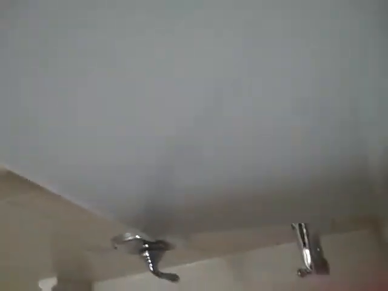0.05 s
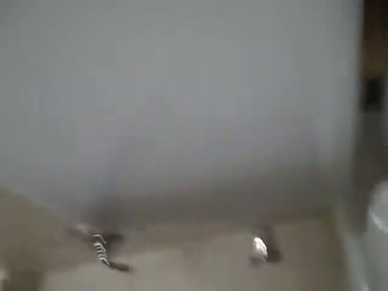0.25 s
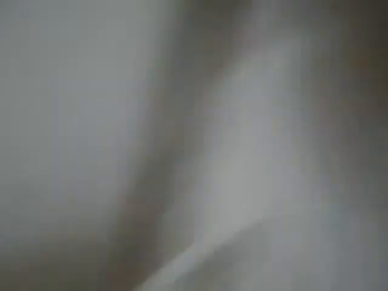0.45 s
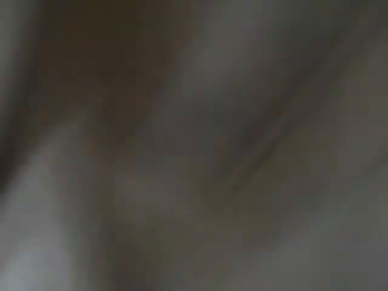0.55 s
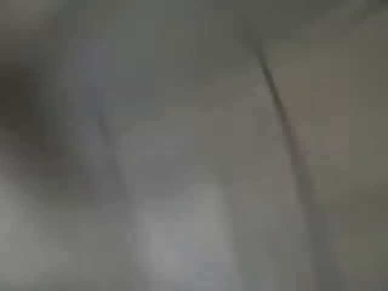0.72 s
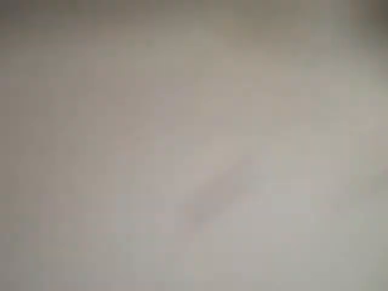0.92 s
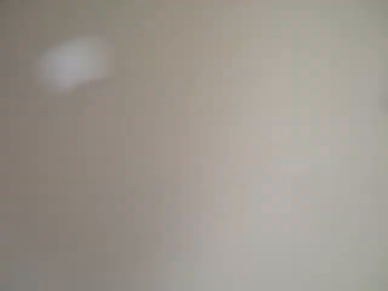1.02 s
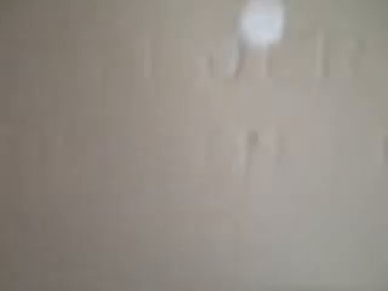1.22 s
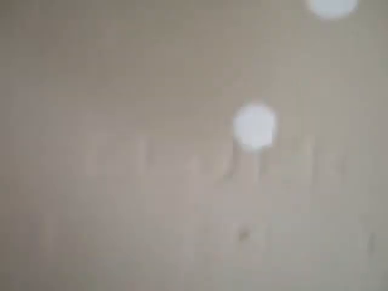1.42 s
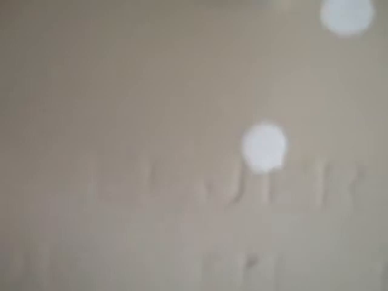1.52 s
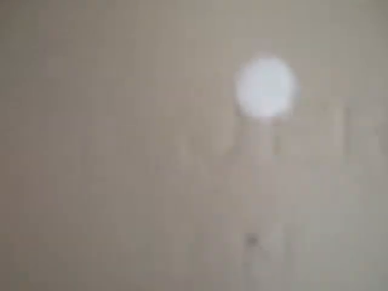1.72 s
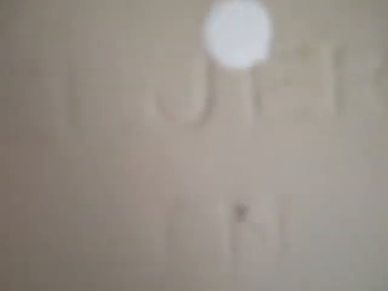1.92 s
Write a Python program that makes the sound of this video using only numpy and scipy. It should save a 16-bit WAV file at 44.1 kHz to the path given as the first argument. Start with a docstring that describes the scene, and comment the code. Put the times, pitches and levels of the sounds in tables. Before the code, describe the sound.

After a moment of quiet room noise with soft bumps, a ceramic lid lands hard, rocks and knocks again with a short hollow ring; then faint sleeve rubbing and handling ticks continue close to the microphone.

```python
"""Soft bumps in quiet room noise, then a heavy ceramic lid set down in a small tiled room.
The lid lands, rocks and knocks a second time: clunks, glaze clinks and low pushes, over ringing modes.
Then cloth and a hand brush faintly near the microphone, with a few ticks and more soft bumps.
Brushing and sliding are shaped noise; ticks are damped resonances with snaps; bumps are fading noise bands."""
import sys
import numpy as np
from scipy import signal
from scipy.fft import rfft, irfft
from scipy.io import wavfile
from scipy.ndimage import map_coordinates

SR = 44100
rng = np.random.default_rng(int(sys.argv[2]) if len(sys.argv) > 2 else 0)


def to_wav(sig):
    """Store sig (one row per channel, or 1-D mono) as 16-bit WAV at the path in sys.argv[1].

    Samples outside -1..1 are clipped; the rate is SR.
    """
    pcm = np.clip(np.atleast_2d(sig), -1, 1) * 32767
    pcm = np.round(pcm).astype(np.int16)
    wavfile.write(sys.argv[1], SR, pcm.T)  # frames by channels


N = 85995  # length in samples
T = np.arange(N) / SR  # time in seconds
HZ = np.fft.rfftfreq(N, 1 / SR)  # frequency axis of the whole scene


def amp(db):
    """Decibels to gain."""
    return 10 ** (np.asarray(db) / 20)


def unit(x):
    """Scales to energy 1."""
    return x / np.sqrt(np.sum(x ** 2) + 1e-20)


def read(points, hz):
    """Reads a table along a log-frequency axis."""
    f, value = np.transpose(points)
    return np.interp(np.log(hz + 1), np.log(f), value)


def add(mix, s, sound):
    """Mixes a sound in at time s, in seconds."""
    part = mix[max(round(s * SR), 0):][:len(sound)]
    part += sound[:len(part)]


def dying(t, t60):
    """Exponential decay that loses 60 dB in t60 seconds."""
    return np.exp(-np.log(1000) * t / t60)


def noise(db):
    """Noise of rms 1 with the given spectrum in dB."""
    coloured = irfft(rfft(rng.standard_normal(N)) * amp(db), N)
    return unit(coloured) * np.sqrt(N)


def crack(spectrum, t60, size=4096):
    """A burst of many fast-dying modes with a causal colour, energy 1."""
    burst = rng.choice([-1., 1.], size) * dying(T[:size], t60)
    hz = abs(np.fft.fftfreq(size, 1 / SR))
    log_gain = np.log(amp(read(spectrum, hz)))
    # minimum phase: the colour starts at once and never rings ahead of the blow
    colour = np.fft.ifft(np.exp(np.conj(signal.hilbert(log_gain)))).real
    return unit(signal.fftconvolve(burst, colour[:size // 2]))


def ping(hz, width_hz, size=4096):
    """One heavily damped resonance with a soft start, energy 1."""
    t = T[:size]
    envelope = t * np.exp(-np.pi * width_hz * t)
    return unit(envelope * np.sin(2 * np.pi * hz * t))


def room(x):
    """Dense reflections from tiled walls build up, then fade; the treble dies first."""
    # Decay of the small tiled room. Each row: frequency in Hz, t60 in seconds
    room_t60 = [(100, .42), (400, 0.33), (1000, .29), (2800, 0.22), (7000, 0.19), (15000, 0.15)]
    build_s = 0.0073
    hz, t, z = signal.stft(rng.choice([-1., 1.], SR), SR, nperseg=256)
    faded = z * dying(t, read(room_t60, hz)[:, None])
    tail = signal.istft(faded, SR, nperseg=256)[1][:SR]
    build = 1 - np.exp(-(T[:SR] / build_s) ** 2)
    return signal.fftconvolve(x, unit(tail * build))[:N]


def ceramic_ring():
    """The modes of lid and bowl, one second of decaying sines with alternating polarity."""
    # Ringing of lid and bowl. Each row: frequency in Hz, relative level in dB, t60 in seconds
    modes = [(168, -29, 0.8), (185.5, -10, 0.42), (307.2, -12.5, 0.55), (337.6, -7, 0.29),
             (386.6, -3.5, 0.41), (392.5, -0.5, 0.13), (433, -2, 0.192), (549, -8.5, .25),
             (577.5, -2, 0.41), (728, -10, 0.28), (793, -2.5, 0.11), (1019, -17.5, 0.46), (1093, 3.5, 0.2),
             (1136, -7, 0.22), (1432, -8.5, .22), (1754, -10.5, .32), (1985, -7.5, 0.27),
             (2645, -13.5, 0.197), (2850, -6, 0.083), (3390, -0.5, 0.13)]
    t = T[:SR]
    ring = np.zeros(SR)
    for k, (hz, db, t60) in enumerate(modes):
        ring += (-1) ** k * amp(db) * dying(t, t60) * np.sin(2 * np.pi * hz * t)
    return ring


def lid():
    """Each contact gives a broad clunk, a clink of glaze and a low push; the landings set the ceramic ringing."""
    # Contacts of the lid. Each row: start in seconds, then relative levels in dB of
    # the clunk, the glaze clink and the low push
    knocks = [(0.2391, -3, -0.5, -6), (0.2405, -0.5, -6, -0.5), (0.244, 0.5, -16, -18.5),
              (0.253, -18, -16.5, -24.5), (0.2664, -7.5, -6, -27.5), (.2937, -8.5, -20, -20),
              (0.3019, -5.5, -5.5, -22)]
    # Colour of the clunk. Each row: frequency in Hz, relative level in dB
    clunk_colour = [(40, -30), (110, -19.5), (180, -2), (260, -7), (400, -0.5), (650, -8.5), (880, -7),
                    (1150, 1), (1600, -5), (2000, -2.5), (3000, -3.5), (5500, -6), (7500, -12),
                    (10500, -23.5), (16000, -28.5)]
    # The two landings that set the ceramic ringing. Each row: start in seconds, gain of the ring in dB
    landings = [(.2405, -26.5), (.3018, -38.5)]
    clunk_base_db, clunk_t60, clunk_room_db = 5, 0.039, -5.5  # t60 in seconds, ahead of the colour
    clink_hz, clink_width_hz, clink_base_db, clink_room_db = 5370, 980, 2, -20.5
    push_hz, push_width_hz, push_base_db = 176, 128, -8

    out = np.zeros(N)
    for s, clunk_db, clink_db, push_db in knocks:
        clunk = amp(clunk_base_db + clunk_db) * crack(clunk_colour, clunk_t60)
        clink = amp(clink_base_db + clink_db) * ping(clink_hz, clink_width_hz)
        push = amp(push_base_db + push_db) * ping(push_hz, push_width_hz)
        add(out, s, clunk)
        add(out, s, clink)
        add(out, s, amp(clunk_room_db) * room(clunk))
        add(out, s, amp(clink_room_db) * room(clink))
        add(out, s, push)
    ring = ceramic_ring()
    for s, db in landings:
        add(out, s, amp(db) * ring)
    return out


def ticks():
    """Close, nearly dry ticks of handling: a hollow pip and a bright snap."""
    # Small ticks. Each row: start in seconds, level in dB, pitch of the hollow part in Hz,
    # snap in dB relative to that level, t60 of the snap in seconds ahead of its colour
    tick_rows = [(.476, -32.5, 870, -11.5, .02), (.535, -36.5, 916, 1.5, 0.027),
                 (.7352, -26, 650, -2, 0.022), (.802, -35.5, 1940, -10, .01),
                 (.888, -31.5, 1880, 5, 0.0083), (.928, -41.5, 1990, 1.5, 0.012),
                 (0.976, -38, 920, 1, 0.015), (1.1488, -23.5, 1073, -3.5, 0.0076),
                 (1.307, -38.5, 750, -11, 0.036)]
    # Resonances of the hollow part. Each row: multiple of the pitch, relative level in dB
    tick_modes = [(1, 0.5), (1.75, -8.5), (3.5, -9.5)]
    # Colour of the snap. Each row: frequency in Hz, relative level in dB
    snap_colour = [(100, -18), (1000, -8), (4000, 7.5), (8000, 1.5), (16000, 3.5)]
    width_hz, room_db = 444, -15.5

    out = np.zeros(N)
    for s, db, hz, snap_db, t60 in tick_rows:
        for ratio, mode_db in tick_modes:
            add(out, s, amp(db + mode_db) * ping(hz * ratio, width_hz))
        add(out, s, amp(db + snap_db) * crack(snap_colour, t60))
    return out + amp(room_db) * room(out)


def bumps():
    """Dull, rough touches, narrow noise bands that die away and linger in the room."""
    # Soft bumps. Each row: start in seconds, level in dB, centre in Hz, t60 in seconds
    bump_rows = [(.019, -37, 296, 0.058), (.039, -34, 690, .05), (.05, -34.5, 202, 0.3),
                 (1.557, -37, 292, .03), (1.61, -39, 663, 0.49), (1.708, -35.5, 780, 0.16)]
    half_width_hz, room_db = 49, -5  # the band is 6 dB down at the half width

    out = np.zeros(N)
    for s, db, hz, t60 in bump_rows:
        band_db = -20 * np.log10(1 + ((HZ - hz) / half_width_hz) ** 2)
        add(out, s, amp(db) * unit(noise(band_db) * dying(T, t60)))
    return out + amp(room_db) * room(out)


def patchy(x):
    """The colour of rubbing shifts at random from place to place."""
    patch_db, patch_hz, patch_s = 1.5, 396, .05  # random spread, spacing in pitch and in time
    hz, t, z = signal.stft(x, SR, nperseg=256)
    places = np.meshgrid(hz / patch_hz, t / patch_s, indexing="ij")
    field = map_coordinates(rng.standard_normal((256, 256)), places, order=1, mode="wrap")
    return signal.istft(z * amp(patch_db * field), SR, nperseg=256)[1][:N]


def cloth():
    """Grainy friction hiss that swells and fades; each brush has its own band of sheen."""
    # Brushes of cloth. Each row: peak in seconds, relative level in dB, rise in seconds,
    # fall in seconds, tilt in dB per octave, sheen centre in Hz, sheen boost in dB
    brushes = [(.228, -62, 0.03, 0.023, -2, 5460, 9), (.57, -64.5, 0.022, 0.081, -3, 11600, 5),
               (.653, -56.5, .007, 0.0073, -2.5, 5450, 11.5), (0.737, -40.5, 0.0018, 0.01, 2, 7500, 6),
               (0.788, -55, 0.054, 0.098, 0.5, 7800, 1.5), (0.889, -58, 0.025, 0.028, -3, 9800, 8),
               (1.02, -64, 0.13, 0.42, -2.5, 12800, 11.5), (1.272, -61, 0.056, 0.031, -1, 9600, 2),
               (1.31, -48.5, 0.0046, .03, -0.5, 8350, 3), (1.412, -66, 0.022, 0.031, -2.5, 9100, 0),
               (1.474, -57, 0.026, 0.029, 0.5, 8900, 1), (1.64, -61.5, 0.1, 0.16, -1, 12800, 6),
               (1.725, -59.5, 0.098, 0.031, -1.2, 13200, 7.5), (1.858, -62, 0.0093, .015, -0.5, 13970, 2),
               (1.905, -58, 0.023, 0.056, -0.5, 8160, 5)]
    # Colour common to the brushes. Each row: frequency in Hz, relative level in dB
    cloth_colour = [(60, -11), (250, -4), (700, -1.5), (1500, -1), (2700, 1.5), (5500, -1), (8000, 1.5),
                    (13000, 0.5), (16000, -7)]
    tilt_pivot_hz, sheen_width_hz = 4000, 970
    grain_db, grain_s = 1.5, 0.0024  # random spread and spacing of the grain

    out = np.zeros(N)
    colour_db = read(cloth_colour, HZ)
    octaves = np.log2(np.maximum(HZ, 300) / tilt_pivot_hz)  # the tilt levels off below 300 Hz
    for s, db, rise, fall, tilt_db, sheen_hz, sheen_db in brushes:
        swell = (np.minimum(T - s, 0) / rise) ** 2
        fade = np.maximum(T - s, 0) / fall
        stroke = np.exp(-swell - fade)
        sheen = sheen_db * np.exp(-((HZ - sheen_hz) / sheen_width_hz) ** 2)
        out += amp(db) * stroke * noise(colour_db + tilt_db * octaves + sheen)
    grain = np.interp(T / grain_s, np.arange(N), rng.standard_normal(N))
    return patchy(out) * amp(grain_db * grain)


def slide():
    """A sleeve slides over a hollow surface: friction noise heard through a few fixed resonances."""
    # Loudness of the slide, silent outside the rows. Each row: time in seconds, rms level in dB
    slide_level = [(.5, -69), (.57, -67.5), (.72, -67.5), (.82, -65.5), (1.0, -70), (1.24, -76), (1.4, -85)]
    # Resonances of the surface. Each row: centre in Hz, width in Hz, relative level in dB
    slide_peaks = [(920, 330, -8.5), (1200, 630, -1), (2570, 320, 0.5), (3710, 160, 1.5), (4290, 180, 0),
                   (5360, 170, -10)]
    gain = sum(amp(db) / (1 + (2 * (HZ - hz) / width) ** 2) for hz, width, db in slide_peaks)
    level_db = np.interp(T, *np.transpose(slide_level), left=-np.inf, right=-np.inf)
    return amp(level_db) * noise(20 * np.log10(gain))


def room_noise():
    """The quiet, steady noise of the room, weighted to the bass."""
    # Colour of the room noise. Each row: frequency in Hz, relative level in dB
    air_colour = [(20, 22.5), (60, 7), (200, 4), (600, 3.5), (1500, 0), (5000, -3), (9000, -8.5),
                  (16000, -9.5)]
    air_db = -66.5  # rms level
    return amp(air_db) * noise(read(air_colour, HZ))


def scene():
    """Lid, handling sounds and room noise at one microphone."""
    handling = ticks() + bumps() + cloth() + slide()
    return (lid() + handling + room_noise())[None]


def record(dry):
    """The recorder's band limit, a steep low-pass."""
    edge_hz = 15800
    low_pass = signal.firwin(511, edge_hz, window=("kaiser", 9), fs=SR)
    return signal.oaconvolve(dry, low_pass[None], "same")


dry = scene()
out = record(dry)
to_wav(out)
```